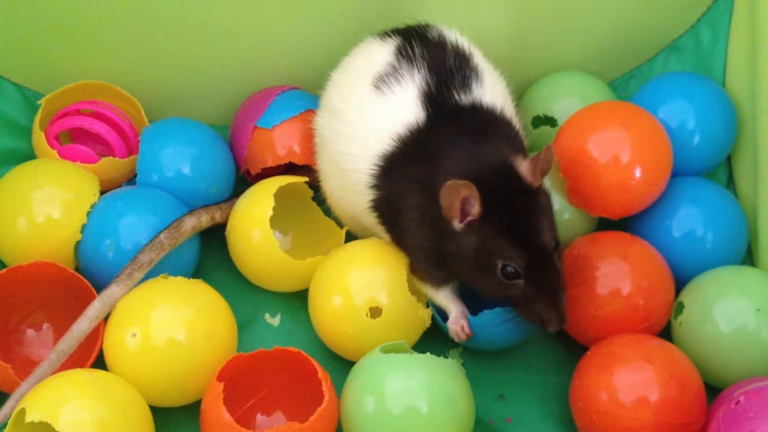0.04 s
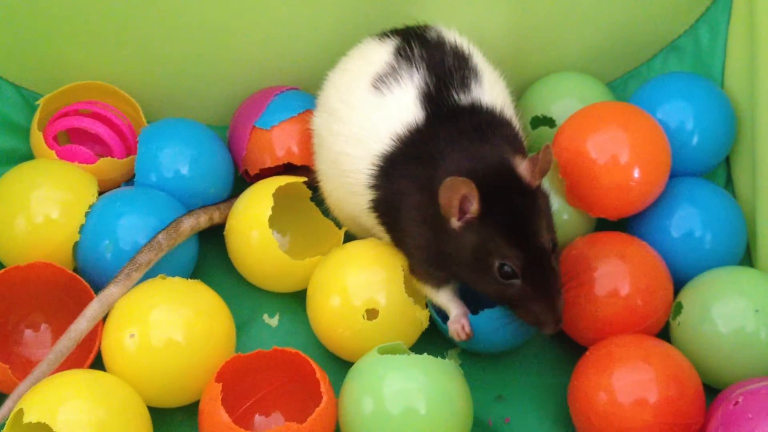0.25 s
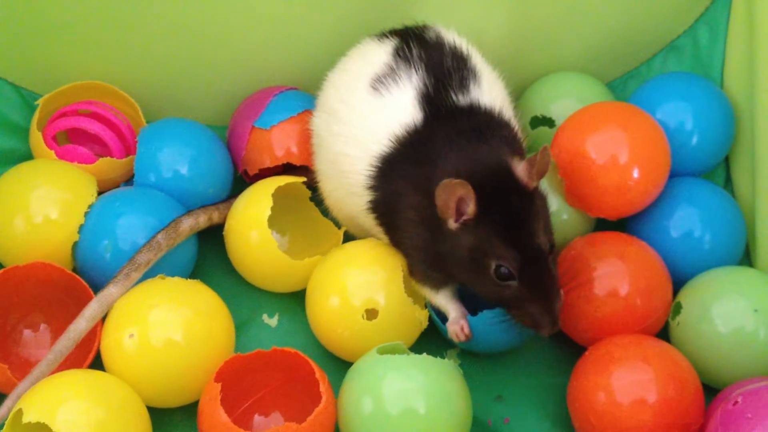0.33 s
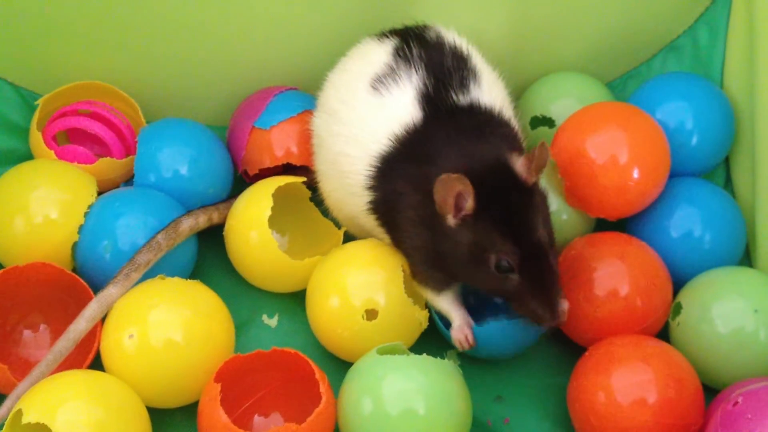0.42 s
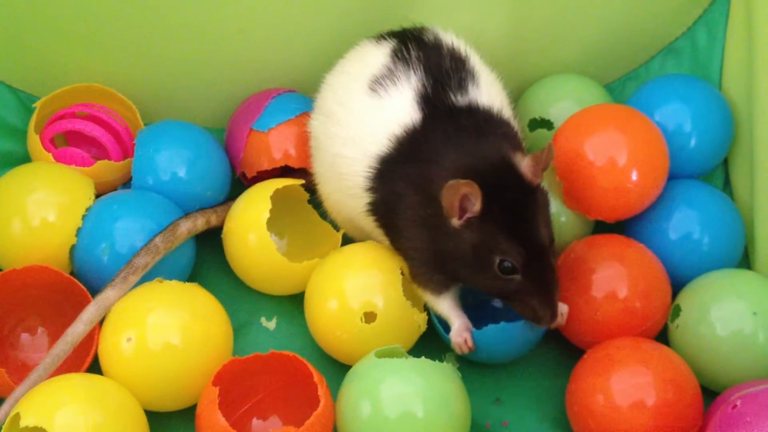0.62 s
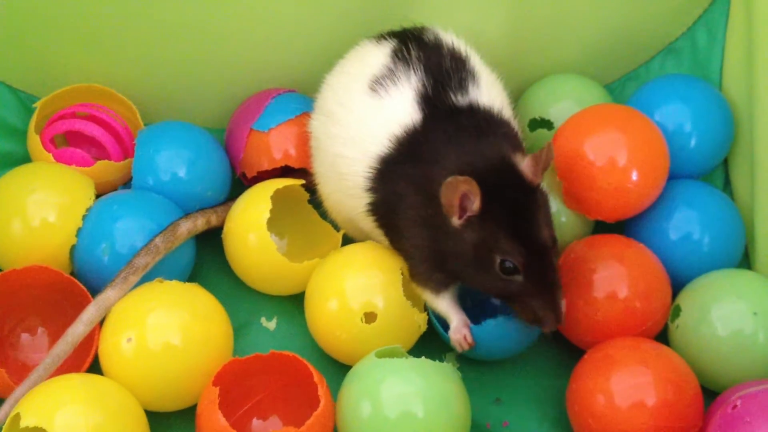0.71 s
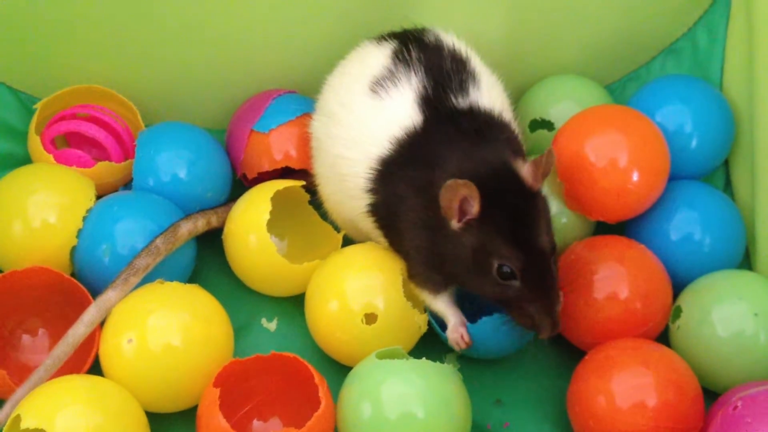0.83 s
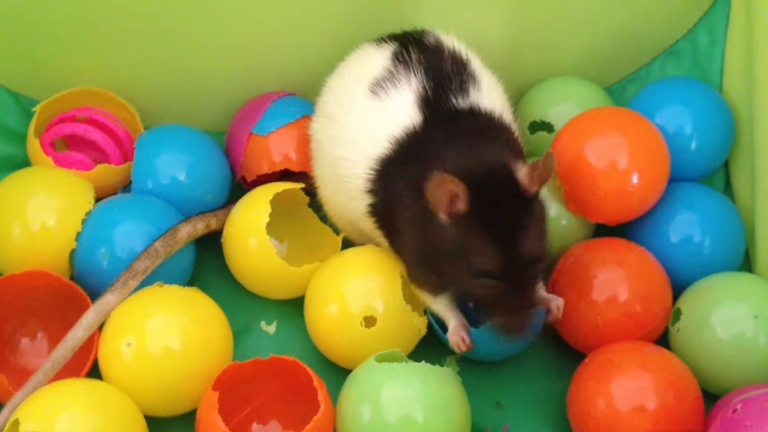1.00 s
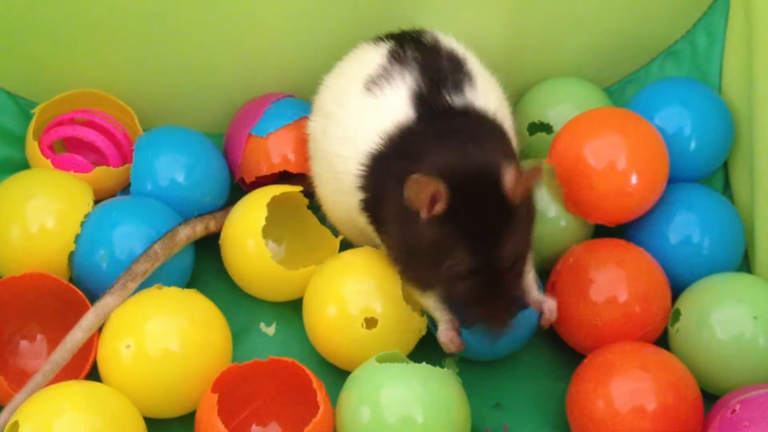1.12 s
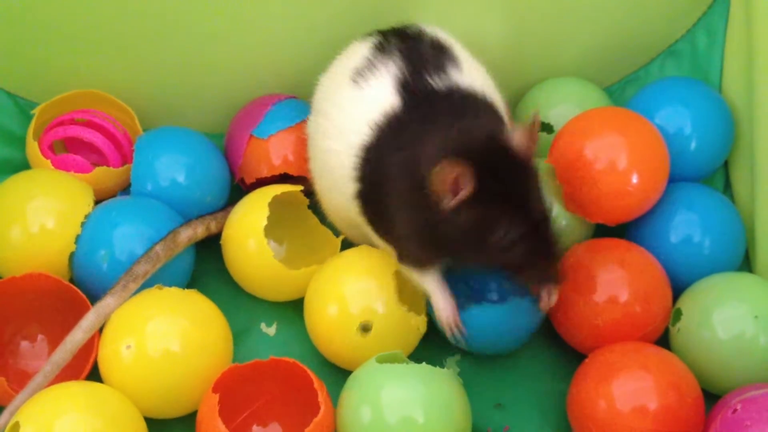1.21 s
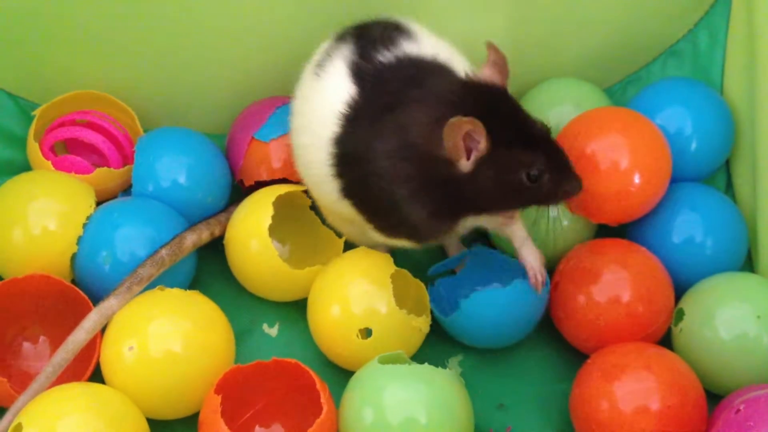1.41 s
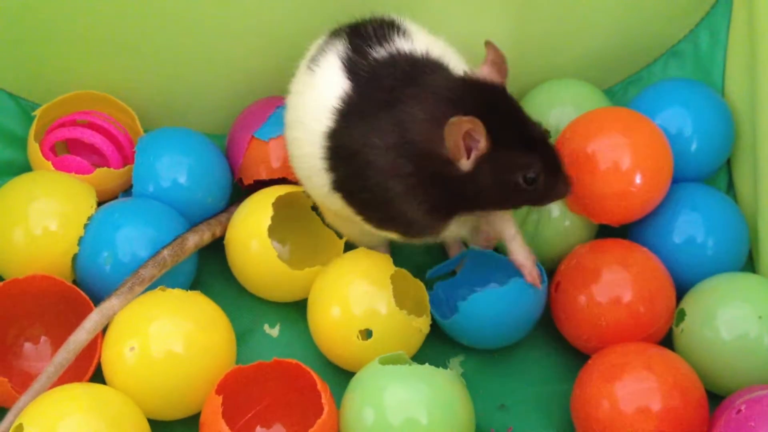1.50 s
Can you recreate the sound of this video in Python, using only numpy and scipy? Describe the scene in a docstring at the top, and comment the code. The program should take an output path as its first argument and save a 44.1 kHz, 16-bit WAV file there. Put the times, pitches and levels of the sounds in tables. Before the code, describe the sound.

Plastic ball bitten by a rat, heard close in a small room with a short tail. Faint scuffing and ticks open; a loud, bright crack snaps at 0.23 s, a light knock at 0.28, a weaker snap at 0.35. Small knocks and soft paw thuds follow until 0.65, then near quiet with faint taps around 0.8-1.0. Scuffs resume from 1.2, with a crisp claw click at 1.46. Low steady hiss and faint hum throughout.

```python
"""Faint hiss and hum, with paws already scuffing over plastic: a rat at a broken hollow ball in a play pen.
Its teeth snap the thin shell, balls knock together, claws catch the broken rim, paws thud on the floor.
Each blow rings decaying sine modes, an air-cavity tone and a noise crackle; thuds are decaying sines.
Scuffs are dense random impulses, shaped in spectrum and pressure; the hiss is shaped noise.
A small room adds a short diffuse tail, one narrow band of which lingers."""
import sys
import numpy as np
from scipy import signal
from scipy.fft import rfft, irfft
from scipy.io import wavfile

SR = 44100
rng = np.random.default_rng(int(sys.argv[2]) if len(sys.argv) > 2 else 0)


def to_wav(s):
    """Save 16-bit WAV."""
    ch = np.atleast_2d(s).T  # columns
    pcm = np.round(np.clip(ch, -1, 1) * 32767)  # PCM
    wavfile.write(sys.argv[1], SR, pcm.astype(np.int16))


N = 68355


def amp(db):
    """Decibels to linear gain."""
    return 10 ** (np.asarray(db) / 20)


def unit(x):
    """Scale to rms 1."""
    return x / np.sqrt(np.mean(x ** 2) + 1e-20)


def fade(t, t60_s):
    """Exponential decay: 60 dB in t60_s."""
    return np.exp(-np.log(1000) * t / t60_s)


def colour(x, points):
    """Shape the spectrum by (freq_hz, gain_db) points, interpolated over log frequency; rms 1."""
    freq_hz, gain_db = np.array(points, float).T
    bins_hz = np.maximum(np.fft.rfftfreq(len(x), 1 / SR), 1)
    gain = amp(np.interp(np.log(bins_hz), np.log(freq_hz), gain_db))
    return unit(irfft(rfft(x) * gain, len(x)))


def add(out, start_s, x):
    """Mix a sound in at start_s, cut at the end of the buffer."""
    i = max(int(start_s * SR), 0)
    out[i:i + len(x)] += x[:len(out) - i]


# hiss spectrum: freq_hz, density_db (per Hz, relative)
HISS_COLOUR = [(25, -42), (60, -19), (95, -21.5), (125, -3.5), (170, 0.5), (250, -3), (400, -5.5),
               (700, -9.5), (1400, -11), (2400, -12.5), (4000, -13.5), (7000, -13), (8200, -15),
               (9200, -23), (11000, -20.5), (14000, -15.5), (15500, -15.5)]
# hum tones: freq_hz, level_db (rms)
HUM_TONES = [(120, -85.5), (731, -83.5)]
HISS_MID_DB, HISS_FADE_DB_PER_S = -68, 1  # level at mid-scene


def background(t):
    """Stationary shaped noise, slowly fading, plus steady sines of random phase."""
    hum = np.zeros(N)
    for freq_hz, level_db in HUM_TONES:
        hum += amp(level_db) * np.sqrt(2) * np.sin(2 * np.pi * (freq_hz * t + rng.random()))
    level_db = HISS_MID_DB - HISS_FADE_DB_PER_S * (t - t.mean())
    hiss = amp(level_db) * colour(rng.standard_normal(N), HISS_COLOUR)
    return hiss + hum


# paws and fur on plastic: start_s, length_s, level_db
SCUFF_STROKES = [(-.03, 0.15, -66.5), (.195, 0.007, -63.5), (0.418, 0.027, -67), (0.439, 0.021, -71),
                 (0.987, 0.04, -75), (1.214, 0.035, -62.5), (1.246, 0.06, -63), (1.272, 0.025, -72),
                 (1.361, 0.0147, -68), (1.427, 0.011, -64), (1.446, 0.0073, -63.5), (1.46, 0.04, -66.5)]
# scuff spectrum: freq_hz, density_db (per Hz, relative)
SCUFF_SPECTRUM = [(200, -34.5), (650, 5.5), (1000, -2), (2200, 0), (4000, 2), (7000, 2.5), (10000, -10),
                  (15000, -27)]
SCUFF_GRAINS_PER_S, SCUFF_SCATTER_DB = 2700, 1


def scuffs(t):
    """Stick-slip friction: random impulses of either sign, scaled by the stroke pressure."""
    slips = (rng.random(N) < SCUFF_GRAINS_PER_S / SR) * np.sign(rng.standard_normal(N))
    slips = slips * amp(SCUFF_SCATTER_DB * rng.standard_normal(N))
    pressure = np.zeros(N)
    for start_s, length_s, level_db in SCUFF_STROKES:
        progress = np.clip((t - start_s) / length_s, 0, 1)
        pressure += amp(level_db) * np.sqrt(np.abs(np.sin(np.pi * progress)))
    return pressure * colour(slips, SCUFF_SPECTRUM)


# contact crackle spectrum: freq_hz, density_db (per Hz, relative)
CRACKLE_COLOUR = [(100, -54), (350, -14), (850, -16), (1150, -7.5), (2000, 2.5), (4000, -3), (7000, 2.5),
                  (8300, -6), (9800, -4), (11500, -20), (14500, -17), (15500, -27)]
CRACKLE_T60_S = 0.024
CAVITY_HZ, CAVITY_T60_S = 622, 0.03
CRACK_ABOVE_HZ = 2800  # modes above this wait for the crack
LOW_HZ, MID_HZ, HIGH_HZ = 1470, 2210, 6000  # corners of the mode weighting


def blow(modes, rise_s, level_db, cavity_db, crackle_db, low_db, high_db=0, crack_lag_s=0, low_pitch=1):
    """A contact rings plastic and enclosed air; high modes and crackle wait until the shell gives way."""
    t = np.arange(SR // 10) / SR
    since_crack = np.maximum(t - crack_lag_s, 0)

    def swell(u, t60_s):
        return (1 - np.exp(-u / rise_s)) * fade(u, t60_s)

    def ring(freq_hz, t60_s, u):
        return np.sin(2 * np.pi * freq_hz * u) * swell(u, t60_s)

    body = np.zeros(len(t))
    for freq_hz, mode_db, t60_s in modes:
        weight_db = np.interp(np.log(freq_hz), np.log([LOW_HZ, MID_HZ, HIGH_HZ]), [low_db, 0, high_db])
        if freq_hz > CRACK_ABOVE_HZ:
            mode = ring(freq_hz, t60_s, since_crack)
        else:
            mode = ring(freq_hz * low_pitch, t60_s, t)
        body += amp(mode_db + weight_db) * mode
    air = amp(cavity_db) * ring(CAVITY_HZ, CAVITY_T60_S, t)
    noise = colour(rng.standard_normal(len(t)), CRACKLE_COLOUR)
    crackle = amp(crackle_db) * noise * swell(since_crack, CRACKLE_T60_S)
    return amp(level_db) * (body + air + crackle)


def blows(events, modes, rise_s):
    """Strike one set of modes at each event time."""
    out = np.zeros(N)
    for start_s, *strength in events:
        add(out, start_s, blow(modes, rise_s, *strength))
    return out


# bitten shell modes: freq_hz (before low_pitch), level_db (before weighting), t60_s
SHELL_MODES = [(1365, -36.5, 0.07), (1600, -15.5, 0.014), (1996, -29.5, 0.032), (2197, -16.5, 0.021),
               (2303, -17.5, 0.019), (3093, -25.5, 0.022), (3508, -16.5, 0.01), (3830, -31.5, 0.037),
               (4905, -14, 0.007), (5530, -6.5, 0.0037), (6350, -0.5, 0.0043), (6660, -19, 0.014),
               (7000, -41, 0.027), (7781, -27.5, 0.026), (9060, -33, 0.029)]
# bites: start_s, level_db, cavity_db, crackle_db, low_db, high_db, crack_lag_s, low_pitch (ratio)
BITE_EVENTS = [(.0410, -45, -18, -25, -22, -11, 0.01, 0.79),
               (.2305, -6.5, -42.5, -20, -2.5, -0.5, 0.00046, 1),
               (.2485, -40, -16, -23, -22, 1, 0.0018, 1.1),
               (.3459, -19.5, -50, -28, -13.5, -6, 0.00089, 1.07), (.3505, -33.5, -29, -35, 2, -19, 0, 1),
               (.3655, -43, -23, -31, -14, -23, 0.0064, 1.15)]


def bites():
    """Teeth load the thin shell, then snap it: low modes start first, high modes after the lag."""
    return blows(BITE_EVENTS, SHELL_MODES, rise_s=0.00053)


# knocked ball modes: freq_hz, level_db (before weighting), t60_s
BALL_MODES = [(1237, -5.5, 0.021), (1576, 3, 0.012), (1810, -9, 0.032), (2220, -2, 0.027),
              (2347, -5, 0.022), (3160, -8.5, 0.015)]
# ball on ball: start_s, level_db, cavity_db, crackle_db, low_db
KNOCK_EVENTS = [(.0532, -51, -3.5, -19, 5), (.2772, -38.5, -9, -16, 0.5), (.4200, -48.5, -11, -15, 2),
                (.4293, -48, 5.5, -7.5, 1), (.6200, -69.5, 10, -9, -6), (.8200, -61.5, 11.5, 3.5, 10.5),
                (0.9383, -56, -2.5, 0, 5.5), (0.994, -62, 5.5, -0.5, 3), (1.0015, -55.5, -1, -4.5, 5)]


def knocks():
    """Ball against ball: a softened contact excites all modes at once."""
    return blows(KNOCK_EVENTS, BALL_MODES, rise_s=0.00052)


# broken rim modes: freq_hz, level_db (before weighting), t60_s
RIM_MODES = [(1374, -14, 0.019), (1820, -10, 0.019), (2073, -3.5, .012), (2250, -13, 0.02),
             (3140, -10, 0.017), (3790, -6.5, 0.016), (4265, -13.5, 0.02), (6420, -3.5, 0.0067),
             (6910, -12.5, 0.016), (8750, -19, 0.017)]
# claws on the rim: start_s, level_db, cavity_db, crackle_db, low_db, high_db
CLAW_EVENTS = [(.4880, -60, -18, -6.5, 3, -2), (1.1718, -48, -13, -18, -32, -6),
               (1.4557, -37, -21.5, -12.5, 1.5, 1), (1.4595, -53, -16, -2, -6, 3)]


def claw_taps():
    """Hard claws catch the rim: a fast rise on the rim modes."""
    return blows(CLAW_EVENTS, RIM_MODES, rise_s=0.0001)


# paws on the pen floor: start_s, level_db, pitch_hz
THUD_EVENTS = [(0.533, -60, 255), (0.587, -60.5, 154), (0.617, -58, 186), (0.635, -60.5, 256),
               (1.282, -58, 248), (1.304, -58.5, 237), (1.457, -57.5, 336), (1.479, -62.5, 343)]
THUD_T60_S = 0.055


def thuds(t):
    """Each step rings the floor as one damped low sine."""
    out = np.zeros(N)
    for start_s, level_db, pitch_hz in THUD_EVENTS:
        add(out, start_s, amp(level_db) * np.sin(2 * np.pi * pitch_hz * t) * fade(t, THUD_T60_S))
    return out


# room tail spectrum: freq_hz, gain_db (relative)
ROOM_SPECTRUM = [(200, 3), (600, 2), (1400, 3.5), (2700, -7.5), (4000, 1), (6500, -6), (10000, -2),
                 (15000, 1.5)]
# lingering narrow band: freq_hz, gain_db (relative)
LINGER_BAND = [(2350, -30), (2650, 0), (2850, 0), (3200, -30)]
ROOM_DB, ROOM_T60_S, ROOM_ONSET_S = -12.5, 0.19, 0.0054
LINGER_DB, LINGER_T60_S = -25.5, 0.39


def room(x, t):
    """Direct sound plus convolution with decaying noise: a short tail and a longer narrow band."""
    def tail(points, t60_s):
        onset = 1 - np.exp(-t / ROOM_ONSET_S)
        noise = colour(rng.standard_normal(N), points)
        return unit(noise * fade(t, t60_s) * onset) / np.sqrt(N)  # unit energy

    response = amp(ROOM_DB) * tail(ROOM_SPECTRUM, ROOM_T60_S)
    response += amp(LINGER_DB) * tail(LINGER_BAND, LINGER_T60_S)
    return x + signal.fftconvolve(x, response)[:N]


LOW_CUT_HZ = 114  # small objects radiate little below this; applied to the foreground sounds only
TOP_HZ = 15250


def scene():
    """Paws and plastic, low-cut, in the room, over the background."""
    t = np.arange(N) / SR
    near = scuffs(t) + bites() + knocks() + claw_taps() + thuds(t)
    low_cut = signal.butter(2, LOW_CUT_HZ, "high", fs=SR, output="sos")
    near = signal.sosfilt(low_cut, near)
    return (room(near, t) + background(t))[None]


def record(dry):
    """The recorder cuts the top: steep elliptic low-pass."""
    top_cut = signal.ellip(10, 0.1, 70, TOP_HZ, fs=SR, output="sos")
    return signal.sosfilt(top_cut, dry)


dry = scene()
out = record(dry)
to_wav(out)
```